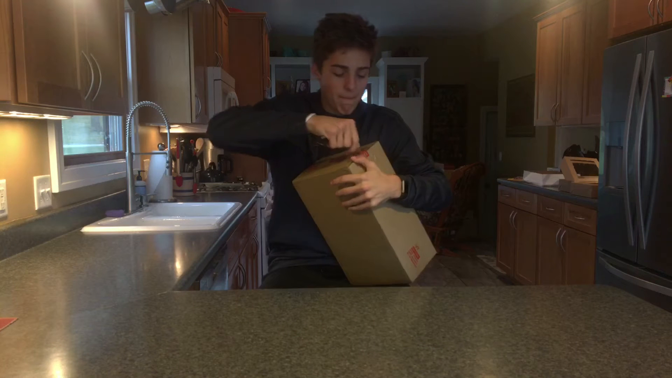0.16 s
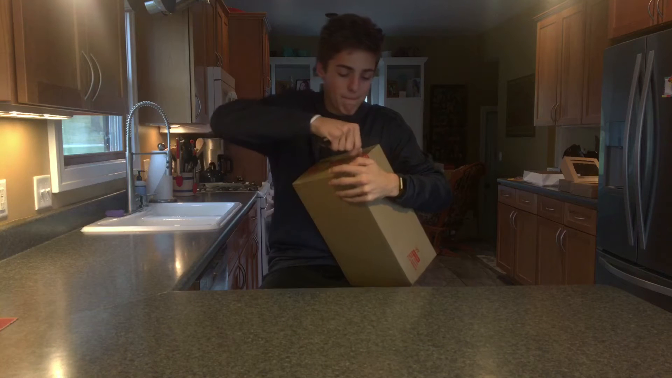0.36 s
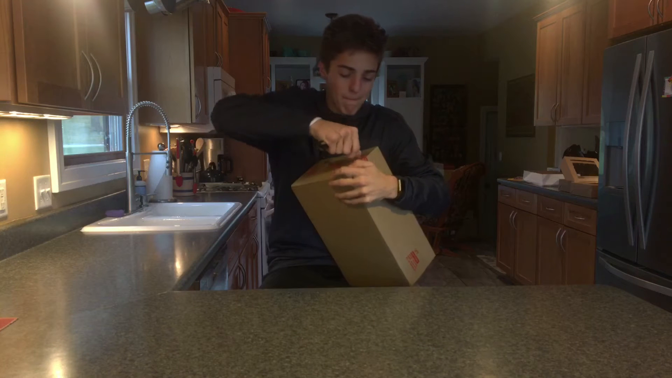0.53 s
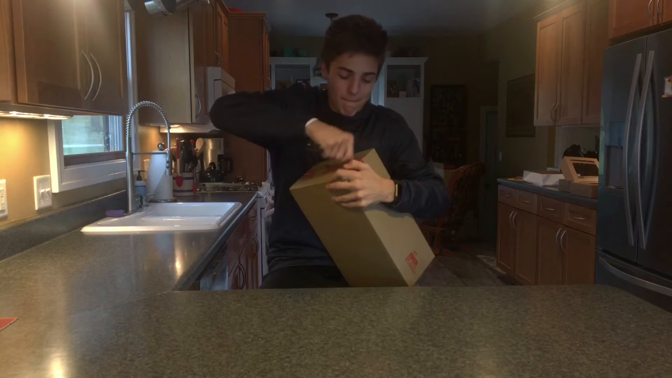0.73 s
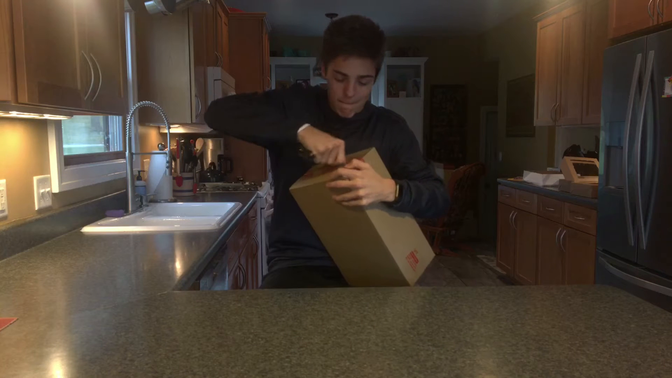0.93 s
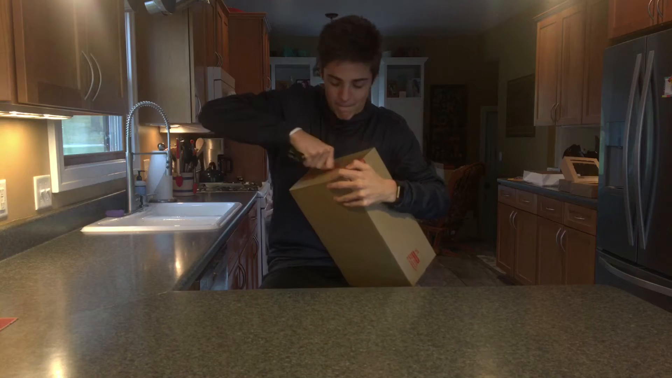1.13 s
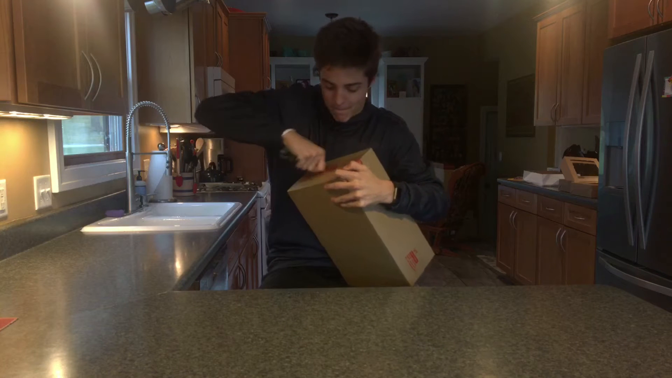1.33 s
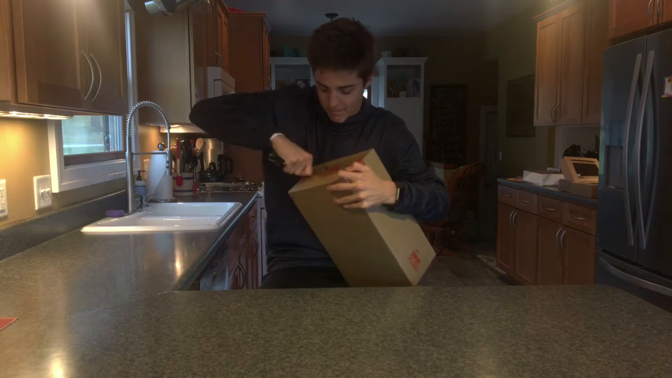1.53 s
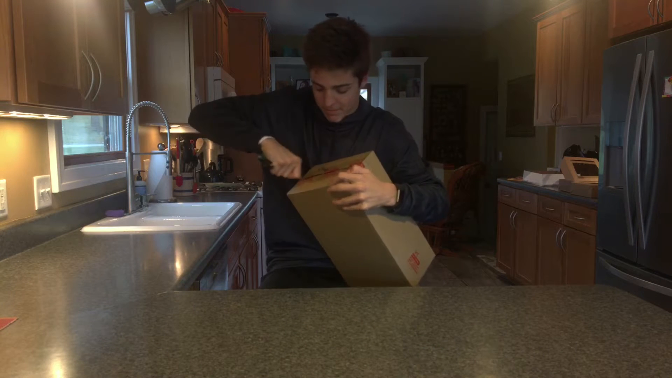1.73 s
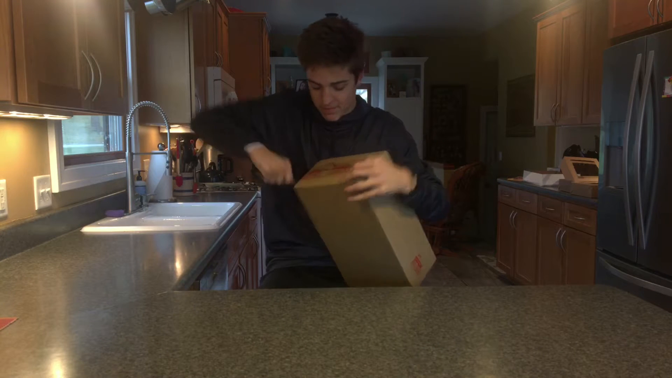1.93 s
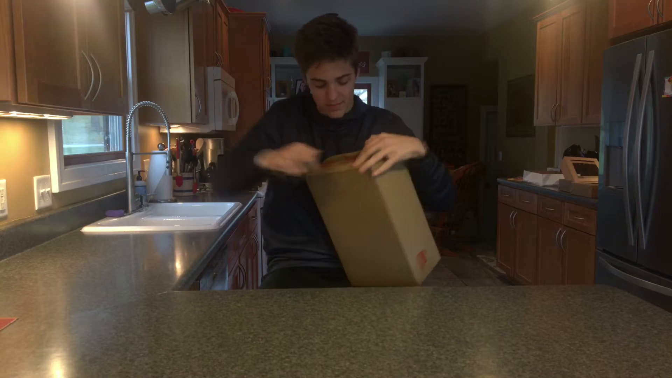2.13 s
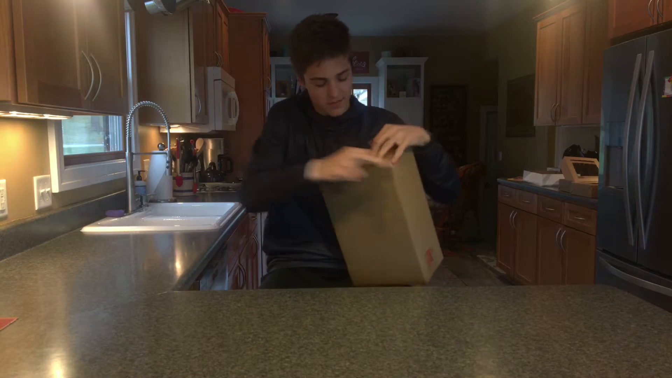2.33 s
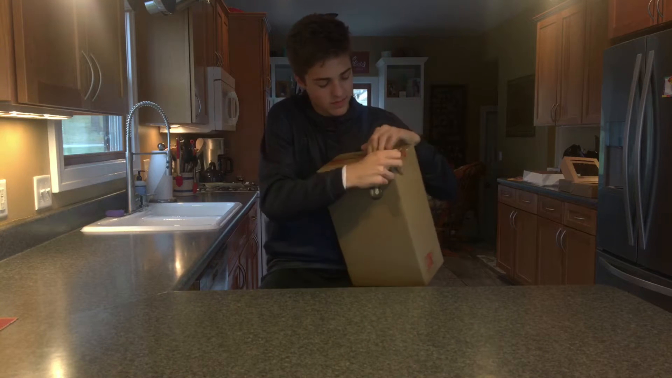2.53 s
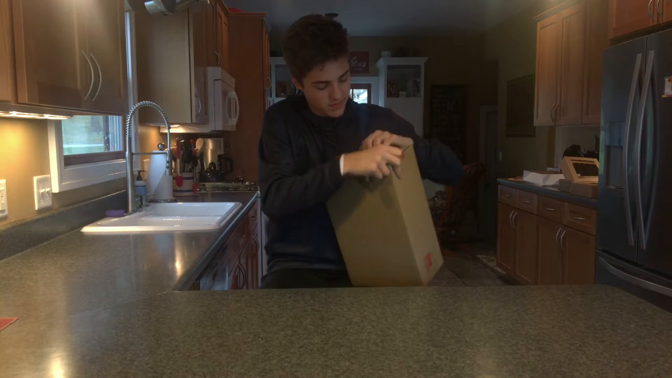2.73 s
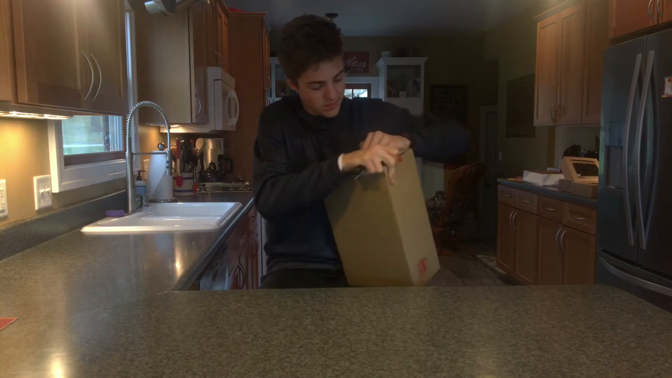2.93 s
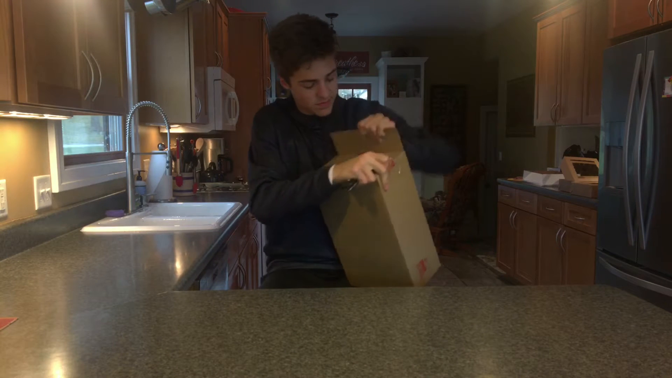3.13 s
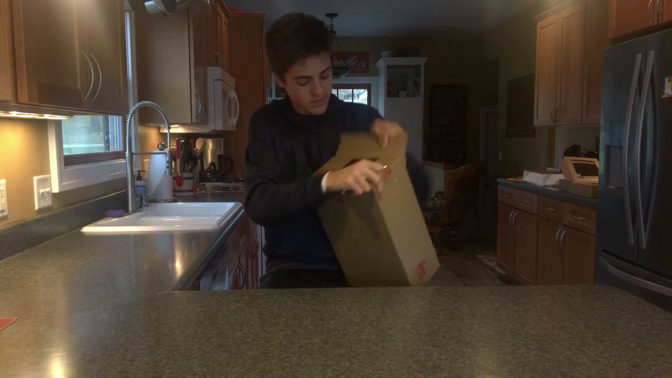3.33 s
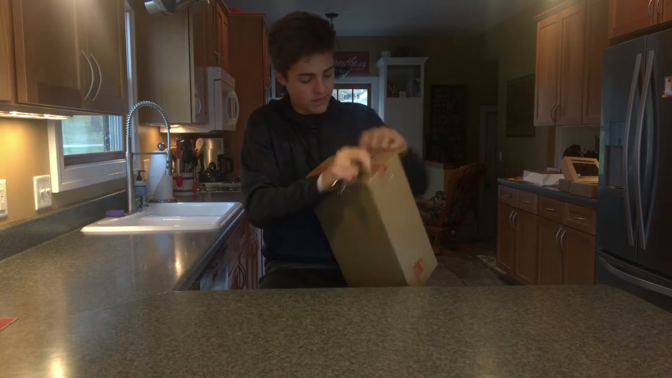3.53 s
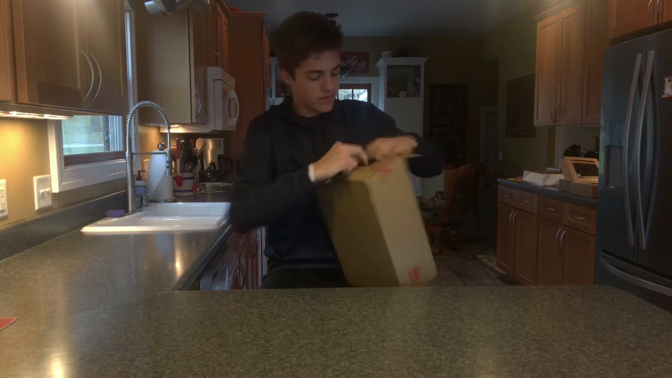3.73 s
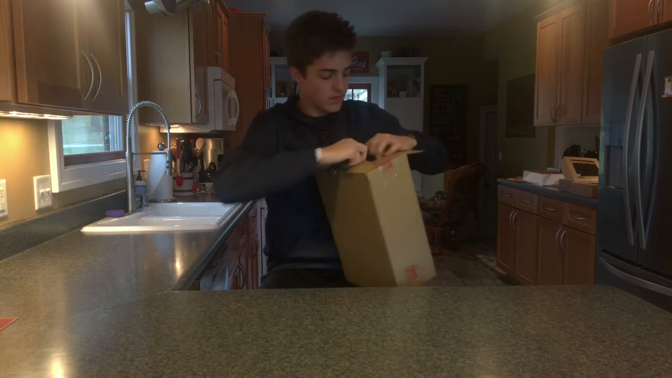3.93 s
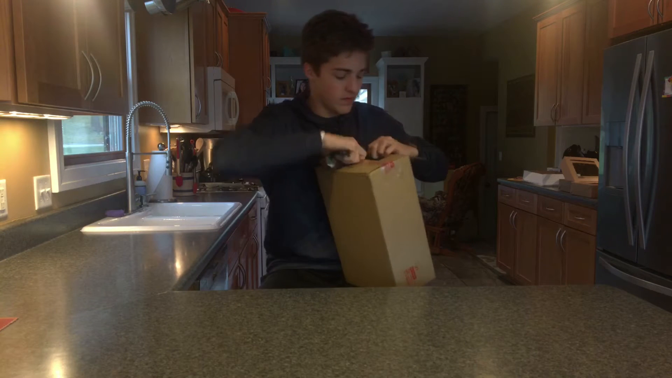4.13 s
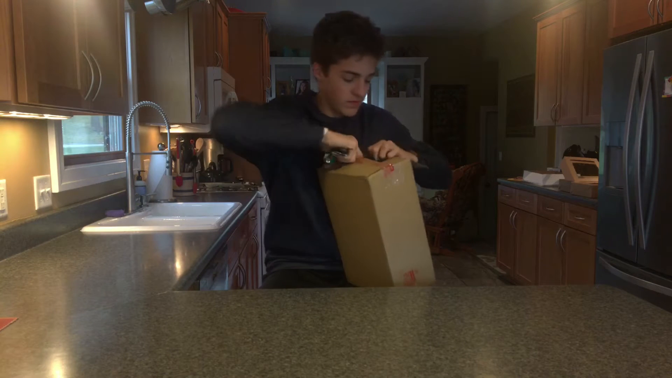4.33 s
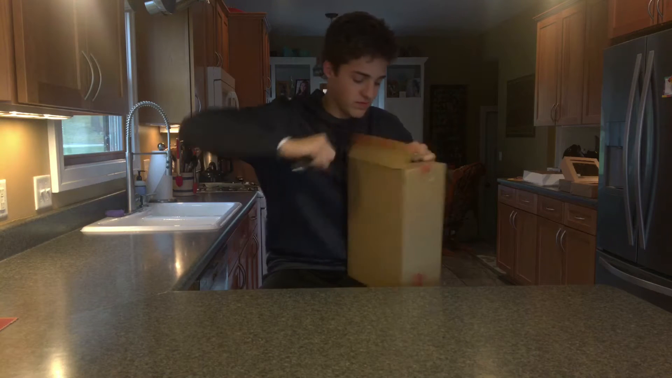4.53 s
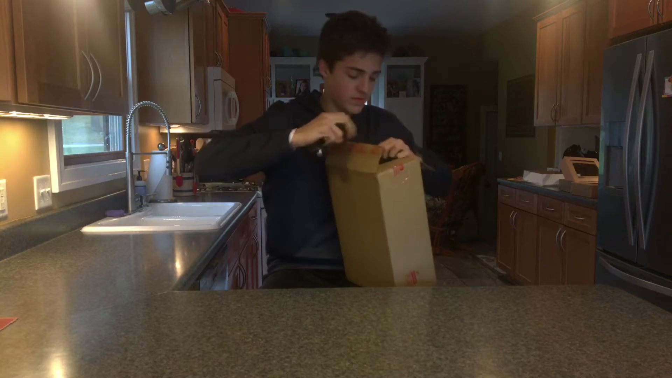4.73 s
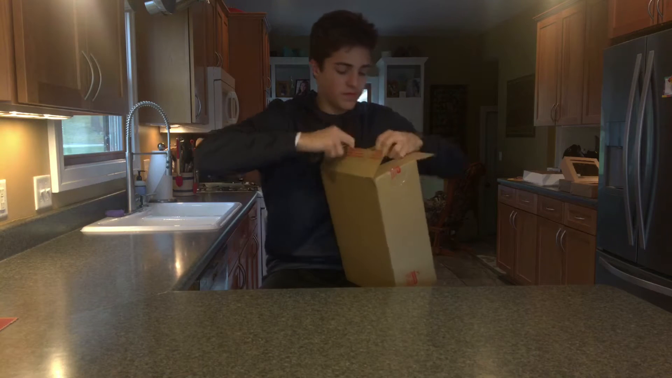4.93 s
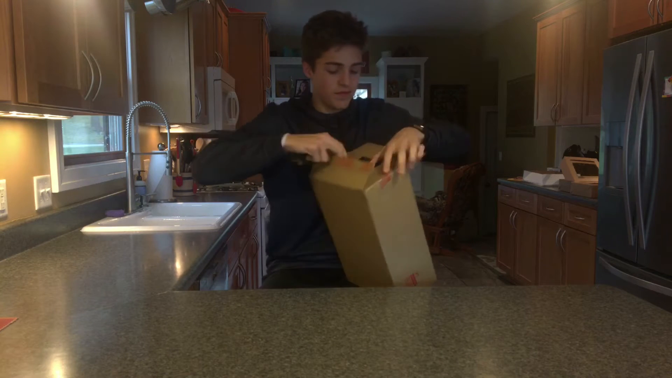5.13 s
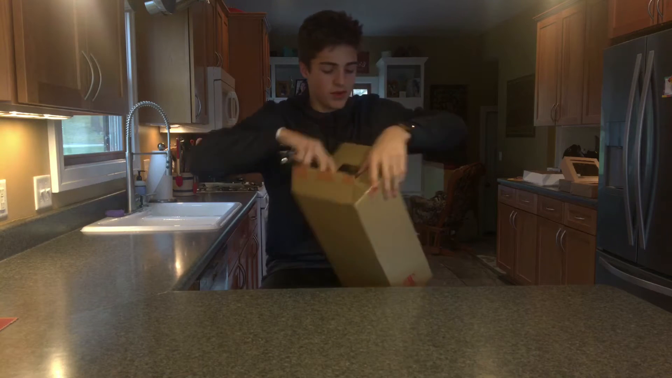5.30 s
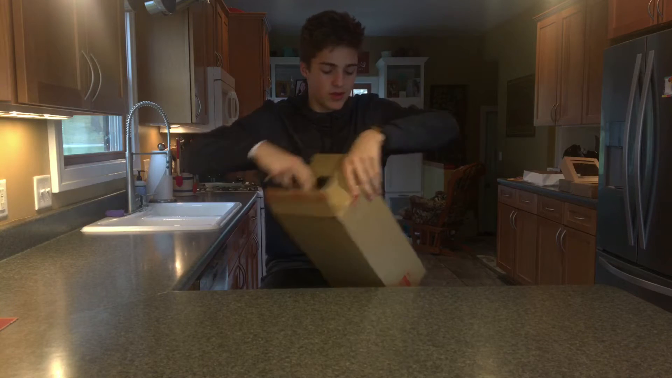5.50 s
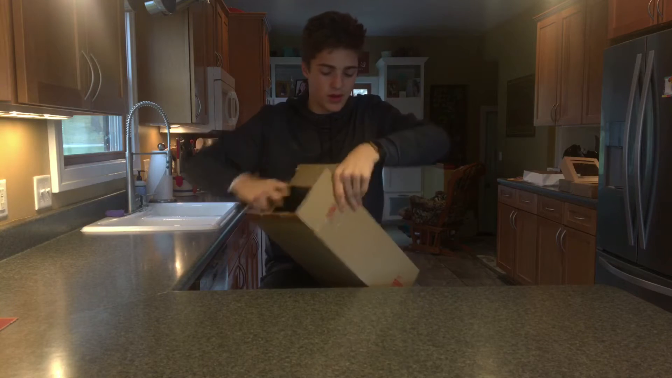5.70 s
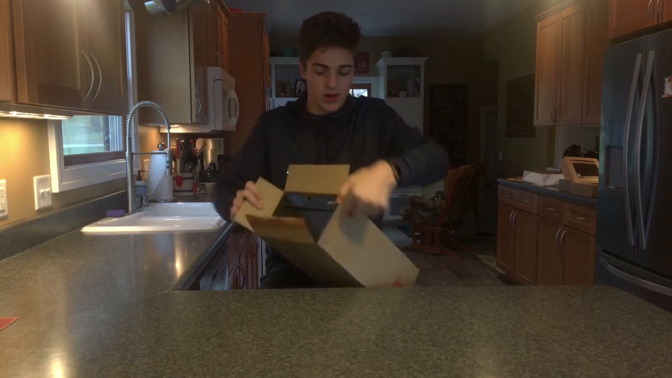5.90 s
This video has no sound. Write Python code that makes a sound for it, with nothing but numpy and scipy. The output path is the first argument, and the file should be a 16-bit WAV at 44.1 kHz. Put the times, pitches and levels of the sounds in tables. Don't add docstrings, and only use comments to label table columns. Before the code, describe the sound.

A medium-sized cardboard carton is opened by hand on a kitchen counter. It starts with dry fibre ticks and light rubbing, then busier tape pops and dull hollow bumps. Palms shift the box quietly before two explosive, very short rips, over a second apart, each booming through the box. Crackling bends and bright tearing scrapes finish it. Mono, close perspective, modest indoor reverberation, soft low room tone.

```python
import sys
import numpy as np
from scipy import signal
from scipy.fft import rfft, irfft
from scipy.io import wavfile
from scipy.ndimage import uniform_filter1d

SR = 44100
rng = np.random.default_rng(int(sys.argv[2]) if len(sys.argv) > 2 else 0)


def to_wav(s):
    ch = np.atleast_2d(s).T
    pcm = np.round(np.clip(ch, -1, 1) * 32767)
    wavfile.write(sys.argv[1], SR, pcm.astype(np.int16))


def makeup_ratio(level_db):
    decades = np.asarray(level_db, float) / 20
    return 10 ** decades


N = 262736


def rms_one(x):
    return x / np.sqrt(np.mean(x ** 2) + 1e-20)


def at_hz(points, hz, col=1):
    table = np.array(points)
    return np.interp(np.log(hz), np.log(table[:, 0]), table[:, col])


def band(x, low_hz, high_hz):
    edges_hz = [low_hz, min(high_hz, 0.45 * SR)]
    return signal.sosfilt(signal.butter(2, edges_hz, "band", fs=SR, output="sos"), x)


def resonance(x, hz, width_hz):
    r = np.exp(-np.pi * width_hz / SR)
    poles = [1, -2 * r * np.cos(2 * np.pi * hz / SR), r * r]
    return signal.lfilter([(1 - r * r) / 2, 0, (r * r - 1) / 2], poles, x)


def drift(rate_hz):
    r = np.exp(-2 * np.pi * rate_hz / SR)
    return rms_one(signal.lfilter([1], [1, -2 * r, r * r], rng.standard_normal(N + SR))[SR:])


def coloured(x, spectrum):
    hz = np.maximum(np.fft.rfftfreq(N, 1 / SR), 1)
    return rms_one(irfft(rfft(x) * makeup_ratio(at_hz(spectrum, hz)), N))


def grit(per_s, spread_db, flicker_db, rate_hz):
    sizes = makeup_ratio(spread_db * np.minimum(rng.exponential(1, N), 4)) * rng.standard_normal(N)
    slips = sizes * (rng.random(N) < per_s / SR)
    return rms_one(slips * makeup_ratio(flicker_db * drift(rate_hz)))


# [f/Hz, width/Hz, level/dB]
PANEL_MODES = [(690, 260, -2), (1258, 99, 2), (1800, 1950, -4.5)]


def panel(x):
    return sum((-1) ** k * makeup_ratio(db) * resonance(x, hz, width) for k, (hz, width, db) in enumerate(PANEL_MODES))


# [f/Hz, level/dB, t60/s]
BOX_MODES = [(141.5, -1.5, 0.069), (296.2, -5.5, 0.087), (340, -1.5, 0.035), (413, -4, 0.013),
             (630, -13.5, 0.03)]


def box(x):
    out = []
    for hz, db, t60_s in BOX_MODES:
        r, w = makeup_ratio(-60 / (t60_s * SR)), 2 * np.pi * hz / SR
        poles = [1, -2 * r * np.cos(w), r * r]
        out.append(signal.lfilter([0, makeup_ratio(db) * np.sin(w)], poles, x + 1e-18))
    return out


def ring_clusters(rows, spread):
    size = 22050
    out = np.zeros(N + size)
    for s, db, hz, t60_s in rows:
        shove = rng.standard_normal(size) * makeup_ratio(-60 * np.arange(size) / (t60_s * SR))
        width_hz = 0.13 * hz * spread
        sound = sum(resonance(shove, hz * ratio ** spread, width_hz) for ratio in (0.91, 1.0, 1.12))
        at = round(s * SR)
        out[at:at + size] += makeup_ratio(db - 4) * sound / np.abs(sound).max()
    return out[:N]


# [f/Hz, density/dB per Hz]
AIR_SPECTRUM = [(53, -28), (90, -4), (221, 1.5), (318, 1.5), (592, -8.5), (4930, -17), (6370, -13),
                (15000, -15)]


def room_air():
    return makeup_ratio(-57.5) * coloured(rng.standard_normal(N), AIR_SPECTRUM)


def counter():
    rest_db, shudder_db, shudder_s = -55, -29.5, 0.027
    lumps = rms_one(band(rng.standard_normal(N), 32.4, 64.0) * makeup_ratio(3.1 * drift(3.6)))
    s, db, deep_db = np.transpose(PUSHES + NUDGES)
    jolts = np.zeros(N)
    jolts[np.round(s * SR).astype(int)] = makeup_ratio(0.91 * (db + deep_db) + shudder_db)
    jolts = uniform_filter1d(jolts, size=900, origin=449)
    shudder = signal.lfilter([1], [1, -np.exp(-1 / (shudder_s * SR))], jolts)
    return lumps * (makeup_ratio(rest_db) + shudder)


# [t/s, length/s, rub level/dB, weight on card/dB]
SEAM_STROKES = [(0.0, 0.019, -52, 7), (0.125, 0.086, -52, -17), (0.304, 0.052, -49, -13),
                (0.61, 0.08, -60.5, -3), (0.738, 0.095, -46, -8), (0.858, 0.016, -41.5, 5.5),
                (0.908, 0.19, -62, -6), (1.034, 0.053, -36, 1.5), (1.144, 0.065, -50, 6),
                (1.232, 0.12, -46.5, 4.5), (1.328, 0.096, -40.5, 10), (1.508, 0.097, -42, 7),
                (1.696, 0.066, -42.5, -9), (1.778, 0.039, -48.5, 14.5), (1.886, 0.21, -50.5, -37)]
# [t/s, length/s, rub level/dB, weight on card/dB]
FLAP_STROKES = [(2.131, 0.028, -51.5, 2), (2.264, 0.054, -46, -7), (2.395, 0.12, -45, -10.5),
                (2.544, 0.049, -66, -15), (2.623, 0.13, -63, -14), (2.734, 0.29, -56, 4),
                (3.14, 0.33, -51, -2), (3.464, 0.033, -48, -15), (3.503, 0.15, -45.5, -5.5),
                (3.725, 0.092, -40, -1.5), (3.895, 0.28, -49.5, -1), (4.162, 0.14, -53, 9.5),
                (4.458, 0.029, -31.5, 3), (4.593, 0.19, -55.5, 9.5), (4.832, 0.12, -51, 3.5),
                (4.98, 0.15, -47.5, -8), (5.116, 0.017, -39.5, -9), (5.15, 0.15, -42.5, -31),
                (5.423, 0.1, -40.5, -23), (5.482, 0.17, -36.5, -6.5), (5.676, 0.17, -31.5, -9)]


def strokes():
    rise_s, fade_s, resting_db = 0.013, 0.035, -77.5
    sheet_follows, hollow_follows = 0.71, 0.84
    t = np.arange(N) / SR
    rub, sheet, hollow = np.full((3, N), makeup_ratio(resting_db))
    for s, length_s, db, weight_db in SEAM_STROKES + FLAP_STROKES:
        rise = np.clip((t - s) / rise_s, 0, 1)
        shape = rise * np.exp(-np.maximum(t - s - length_s, 0) / fade_s)
        rub = rub + makeup_ratio(db) * shape
        sheet = sheet + makeup_ratio(db + sheet_follows * weight_db) * shape
        hollow = hollow + makeup_ratio(db + hollow_follows * weight_db) * shape
    return rub, sheet, hollow


# [f/Hz, density/dB per Hz]
RUB_SPECTRUM = [(900, -41), (1500, -11.5), (2440, -13), (3900, -6), (7100, -5), (10300, -4), (13000, -4.5),
                (16000, -6)]


def rubbing():
    rub, bend, hollow = strokes()
    fibres = grit(per_s=290, spread_db=6.0, flicker_db=-1.0, rate_hz=34)
    slips = grit(per_s=12000, spread_db=2.5, flicker_db=2.2, rate_hz=40)
    slips = coloured(slips + 0.15 * fibres, RUB_SPECTRUM)
    edges_hz = np.geomspace(1000, 19000, 12)
    bright = 0
    for k in range(11):
        patch_db = np.minimum(2.7 * drift(37) + 1.4 * drift(3.5), 4.0)
        bright = bright + (-1) ** k * band(slips, *edges_hz[k:k + 2]) * makeup_ratio(patch_db)
    bright = rms_one(bright)
    sheet = grit(per_s=4000, spread_db=2.0, flicker_db=3.5, rate_hz=50)
    sheet = rms_one(panel(sheet) + 0.16 * band(sheet, 410, 1700))
    shoves = grit(per_s=400, spread_db=2.0, flicker_db=2.5, rate_hz=22)
    rumble = rms_one(band(sum(box(shoves)) + 2.6 * band(shoves, 150, 480), 187, 770))
    return makeup_ratio(-2.5) * rub * bright + makeup_ratio(-4.5) * bend * sheet + makeup_ratio(-5.5) * hollow * rumble


def flecks():
    per_s, level_db, fade_ms, width_share = 260, -10, 6, 0.08
    rub = strokes()[0]
    fade = np.exp(-1000 / (fade_ms * SR))
    born = rng.random(N) < per_s / SR
    dealt = rng.integers(0, 16, N)
    noise = rng.standard_normal(N)
    total = 0
    for k, hz in enumerate(np.geomspace(1500, 9000, 16)):
        scuffs = noise * signal.lfilter([1], [1, -fade], (born & (dealt == k)) + 1e-18)
        total = total + resonance(scuffs, hz, width_share * hz) / np.sqrt(hz)
    return makeup_ratio(level_db) * rub * rms_one(total)


# [f/Hz, t60/s, level/dB]
KITCHEN_TAILS = [(98, 0.41, -5.5), (296, 0.37, -11.5), (570, 0.49, -7.5), (1260, 0.6, -5),
                 (2300, 0.55, -9.5), (4050, 0.64, -11.5), (8500, 0.37, -11.5), (14500, 0.23, -15.5)]


def kitchen(x, cracks):
    scatter_per_s = 600
    t = np.arange(SR) / SR
    edges_hz = 60 * 2 ** np.arange(0, 8.6, 0.5)
    place = 2.279 * np.arange(N) / SR
    out = 0
    for k in range(3):
        tail = 0
        for low, high in zip(edges_hz, edges_hz[1:]):
            hz = np.sqrt(low * high)
            decay = makeup_ratio(-60 * t / at_hz(KITCHEN_TAILS, hz)) * (1 - np.exp(-t / 0.0015))
            dying = rng.standard_normal(SR) * decay
            dying = dying / np.sqrt(np.sum(dying ** 2))
            tail = tail + 2.41 * makeup_ratio(at_hz(KITCHEN_TAILS, hz, 2)) * band(dying, low, high)
        share = np.cos(np.pi * (place + k) / 3) ** 2
        sent = x * share + cracks * drift(scatter_per_s) / np.sqrt(8)
        out = out + signal.fftconvolve(sent, tail)[:N]
    return out


# [t/s, level/dB, f/Hz, t60/s]
BUZZES = [
    (3.068, -25.5, 1430, 0.95),
    (5.7, -28, 3460, 0.34),
    (1.6, -43, 4100, 0.19),
    (0.0044, -39, 139, 0.22),
]


def buzzes():
    return ring_clusters(BUZZES, spread=0.31)


# [t/s, level/dB, treble re level/dB, ring f/Hz]
TICKS = [(0.024, -34.5, 3, 4000), (0.0858, -33, 2, 3800), (0.089, -34, 1, 3800), (0.1404, -27.5, -12, 2300),
         (0.1512, -31, 6, 8200), (.1545, -34, -8, 6500), (0.3073, -37, 2, 8500), (0.3177, -36, -8, 2200),
         (.338, -38, 6, 9000), (.351, -29, -1, 2750), (.404, -35, -4, 2690), (0.4857, -42, -7, 5100),
         (0.588, -32.5, -1, 7100), (0.647, -30.5, 6.5, 5660), (0.6936, -36, -2, 2450),
         (.699, -37, -2, 8500), (0.7406, -29, 8, 7000), (1.9218, -24.5, -4, 2520),
         (1.9958, -30.5, -20, 3080), (2.14, -27.5, -6, 4040), (2.2835, -39, -11, 2550),
         (2.481, -33, 5, 1630), (2.5373, -30.5, -1, 4400), (2.5955, -35.5, -1, 4260), (2.756, -31, 0, 4070),
         (2.814, -32.5, -1, 4170), (2.873, -26, -6, 4740), (2.936, -50, 12, 9000), (2.9619, -35, 1, 2400),
         (2.985, -52, -12, 5500), (3.016, -54, -3, 1930), (3.454, -31.5, -2, 5570),
         (1.2366, -26.5, 1, 4570), (1.296, -18, 0, 2900), (1.372, -21, -4, 3000), (3.642, -39, 0, 6000),
         (3.805, -24.5, 4, 5860), (3.86, -28, -15, 3890), (3.874, -26, -9, 3700), (4.033, -38, -6, 4500),
         (5.488, -27, 4, 4530), (5.5628, -26, 2, 4550), (3.937, -45, 0, 2410), (4.06, -30, 3, 2450),
         (4.099, -27, -5.5, 2500), (4.24, -23.5, -15, 1670), (4.794, -30.5, -4, 5140),
         (4.9352, -34, 8.5, 4060)]
# [t/s, level/dB, treble re level/dB, ring f/Hz, length/ms]
TEARS = [
    (0.327, -27, -0.5, 3330, 6.4),
    (1.5351, -32, -27, 1720, 11),
    (1.708, -25, -13, 5180, 6.1),
    (2.2857, -27, 0, 6400, 11),
    (5.489, -19, 4, 3180, 4.6),
    (5.56, -12.5, 6.5, 4650, 7.7),
    (5.689, -24, -15, 2960, 4.2),
    (5.7075, -13.5, 4.5, 5230, 24),
]
# [t/s, level/dB, treble re level/dB, ring f/Hz]
TAPE = [(.743, -15, 4, 2600), (0.866, -28, -1, 2270), (0.873, -17.5, -5, 2870), (0.952, -23, -2, 2960),
        (1.035, -26, -12, 4250), (1.073, -19, -4, 1686), (1.1764, -25.5, -1, 1970), (1.24, -21, 0, 6800),
        (1.274, -15, -6.5, 2950), (1.3038, -19, -5, 5300), (1.3289, -10, -5, 3780), (1.353, -14, -8, 5670),
        (1.583, -22, 1, 1790), (1.636, -19, 1, 3060), (1.751, -25, -11, 3520), (1.783, -9.5, -6.5, 7800),
        (1.8116, -19.5, -2, 2500)]
# [t/s, level/dB, treble re level/dB, ring f/Hz]
SNAPS = [(2.152, -21.5, -6.5, 3440), (2.749, -28.5, -15, 4130), (2.847, -27.5, -1, 6200),
         (3.5037, -20.5, -1, 4560), (3.585, -23, 1, 2880), (3.624, -20, -1, 3460),
         (3.6971, -11.5, 5.5, 9040), (3.71, -7.5, -5, 8300), (3.7652, -18.5, 0, 9850),
         (3.9518, -25, 1, 2620), (4.073, -22, -5, 3100), (4.1789, -47, -10, 1820),
         (4.344, -26.5, 3.5, 3060), (4.3612, -15, 2.5, 4700), (4.7524, -23, -12, 4470),
         (4.8215, -37, 6, 2180), (5.1294, -20.5, 1, 4500), (5.1592, -16, 3, 3980), (5.2542, -18, -15, 4900),
         (5.287, -17, -2, 2750), (5.4012, -12.5, -20, 1620), (5.8613, -19, -20, 4470),
         (5.9391, -11.5, -4, 5600)]
# [t/s, level/dB, treble re level/dB, ring f/Hz, length/ms]
RIPS = [(3.0612, -0.5, -2.5, 3060, 2.76), (3.0634, -8, -16, 1420, 2.9), (3.068, -3, -17, 3460, 1.6),
        (3.075, -2, -16, 1530, 4), (3.0836, -11, 7, 5530, 3.05), (3.088, 0.5, -15, 1780, 2.8),
        (3.092, -0.5, -20, 1700, 8.2), (4.3963, 0.5, -10, 2460, 2.86), (4.401, -10, -4, 2830, 1.8),
        (4.4069, -3.5, 2.5, 4220, 2.45), (4.4175, -1, -0.5, 4100, 1.3), (4.4484, -18, -7, 2800, 2),
        (4.4331, -7, 3, 6800, 2.1), (4.438, -0.5, -19, 1920, 2.5), (4.443, -10, -12, 1490, 2.1)]


def snaps():
    tick_ms, crack_ms, brittle_hz = 1.37, 3.13, 8500
    rows = [(*row, tick_ms) for row in TICKS]
    rows += [(*row, crack_ms if row[-1] < brittle_hz else tick_ms) for row in TAPE + SNAPS]
    rows += TEARS + RIPS
    count, size = len(rows), 4096
    out = np.zeros(N + size)
    t_ms = np.arange(size) / SR * 1000
    crackle = rng.standard_normal((count, 3, size))
    crackle = crackle * makeup_ratio(4.29 * rng.standard_normal((count, 1, size)))
    lumps = uniform_filter1d(rng.standard_normal((count, 1, size)), size=40) * np.sqrt(40)
    crackle = crackle * makeup_ratio(2.78 * lumps)
    for (s, db, treble_db, hz, ms), noise in zip(rows, crackle):
        rise_ms = 0.35 + 3.44 * max(ms - 2.7, 0)
        burst = noise * np.exp(-t_ms / ms) * (1 - np.exp(-t_ms / rise_ms))
        middle = band(burst[0], np.clip(0.65 * hz, 1300, 4500), 7000)
        middle = middle + 1.96 * resonance(burst[0], hz, 0.24 * hz)
        treble = band(burst[1], 7700, 19000)
        sheet_db = -16 - 0.5 * np.log2(hz / 3000)
        sound = middle + makeup_ratio(treble_db + 4.5) * treble + makeup_ratio(sheet_db + 20.5) * panel(burst[2])
        at = round(s * SR)
        out[at:at + size] += makeup_ratio(db - 6.5) * sound
    return out[:N]


# [t/s, level/dB, f/Hz, t60/s]
SCRAPES = [(5.49, -25, 5300, 0.14), (5.514, -28, 5200, 0.092), (5.517, -41, 3100, 0.09),
           (5.633, -27.5, 3230, 0.11), (5.68, -27, 3000, 0.13), (5.708, -17.5, 5100, 0.14),
           (5.71, -24, 8600, .2), (5.757, -23.5, 5600, 0.39), (5.81, -27, 8300, 0.22),
           (5.855, -26.5, 3500, 0.044), (5.636, -24.5, 335, 0.13), (3, -34, 3500, 0.29),
           (0.12, -43, 3100, 0.25)]


def scrapes():
    return ring_clusters(SCRAPES, spread=0.31)


# [t/s, level/dB, f/Hz, t60/s]
KNOCKS = [(0.743, -24.5, 1800, 0.078), (1.074, -22, 665, 0.083), (1.786, -25.5, 744, 0.17),
          (2.441, -36, 1110, 0.078), (3.061, -8, 1410, 0.026), (3.066, -1, 1284, 0.049),
          (3.085, -11, 1330, 0.092), (3.961, -27.5, 510, 0.021), (4.397, -3.5, 820, 0.017),
          (4.433, -2, 1990, 0.014), (4.441, -11.5, 630, 0.032), (4.822, -14.5, 630, 0.02),
          (5.131, -35.5, 530, 0.064), (5.254, -19.5, 1130, 0.037), (5.401, -17, 800, 0.033),
          (5.737, -14, 1240, 0.016), (5.939, -20, 1620, 0.023)]


def knocks():
    return ring_clusters(KNOCKS, spread=1)


# [t/s, level/dB, deepest mode re level/dB]
PUSHES = [(0.751, -24, -4), (0.876, -11.5, -11), (1.042, -20.5, -26), (1.073, -19.5, -23),
          (1.278, -15.5, -16), (1.331, -12.5, -43), (1.507, -21.5, -34), (1.787, -15, -23),
          (1.816, -15, -3), (2.449, -20.5, -12), (2.801, -28.5, -16), (3.062, -12.5, -3), (3.09, 4, -9.5),
          (3.589, -16, -18), (3.632, -23.5, -22), (3.705, -13, -12.5), (3.8, -17, -19), (3.968, -22.5, -11),
          (4.135, -26.5, -6), (4.208, -18.5, -18), (4.316, -24, -34), (4.4, -2.5, -9), (4.435, 1, -2.5),
          (4.828, -15, -24), (4.894, -23, -26), (5.159, -25.5, -7.5), (5.258, -20.5, -12),
          (5.403, -23.5, -31), (5.642, -26, -14), (5.741, -17, -11)]
# [t/s, level/dB, deepest mode re level/dB]
NUDGES = [(1.162, -36, 0), (0.916, -40, -17), (1.353, -12, -18), (3.87, -30, -15), (4.365, -25, -14),
          (1.45, -33.5, 11), (1.56, -39, 9), (1.619, -39.5, 15), (1.09, -33, 4), (2.143, -44, -7),
          (2.284, -44, 5), (2.329, -45.5, 13), (2.87, -48, 10), (2.937, -33.5, -7), (3.543, -29, -15),
          (3.757, -27, -0.5), (4.182, -24.5, -12), (4.25, -22, -14), (5.29, -25.5, -15), (5.326, -31.5, 2),
          (5.857, -26, -4.5)]


def pushes():
    grip_spread_db, palm_s = 3.0, 0.002
    wall_hz, wall_width_hz = 352, 193
    s, db, deep_db = np.transpose(PUSHES + NUDGES)
    at = np.round(s * SR).astype(int)
    grips_db = grip_spread_db * rng.standard_normal((len(s), len(BOX_MODES)))
    contacts = np.zeros((len(BOX_MODES), N))
    contacts[:, at] = makeup_ratio(db - 8.5 + grips_db.T)
    contacts[0, at] = makeup_ratio(db + deep_db + 2.0)
    deep, *upper = [mode[k] for k, mode in enumerate(box(contacts))]
    soft = np.exp(-1 / (palm_s * SR))
    upper = signal.lfilter([3.89 * (1 - soft)], [1, -soft], sum(upper))
    blow = deep + resonance(upper, wall_hz, wall_width_hz) + 0.21 * upper
    return band(band(blow, 201.6, 950), 107, 1000)


# [t/s, level/dB, f/Hz, t60/s]
CORNERS = [(.8721, -31, 700, .08), (1.0601, -37, 175, 0.18), (1.3851, -31, 720, 0.14),
           (1.3951, -32, 1350, .12), (1.5101, -34, 800, 0.089), (1.5301, -37, 4500, .15),
           (1.5801, -31, 1870, 0.046), (2.1581, -39, 3400, 0.11), (2.2801, -40, 2500, 0.19),
           (2.7491, -30, 4250, 0.044), (2.7801, -41, 186, 0.42), (3.0661, -17, 3500, .2),
           (3.1901, -31, 3050, 0.27), (3.2101, -29, 323, 0.077), (3.4651, -41, 2400, 0.058),
           (3.5221, -40, 1900, .05), (3.8601, -37, 1950, .08), (3.9501, -34, 2500, 0.038),
           (4.0741, -33, 3200, 0.046), (4.0971, -31, 2540, 0.027), (4.1761, -36, 1830, 0.28),
           (4.2001, -37, 1290, 0.23), (4.2221, -27, 338, 0.13), (4.8221, -23, 1990, .04),
           (5.1621, -23, 3470, 0.055), (5.4881, -28, 2570, 0.055), (5.4941, -28, 3250, .08),
           (5.5101, -30, 1800, 0.21), (5.5241, -29, 4700, 0.039), (5.5631, -21, 4550, .06),
           (5.5871, -31, 2400, .08), (5.6451, -27, 343, .12), (5.6801, -30, 2200, .1),
           (5.6881, -28, 4200, 0.18), (5.7051, -26, 5900, .1), (5.7351, -20, 1900, 0.044),
           (5.7361, -22, 745, 0.058), (5.7541, -25, 6100, .06), (5.7921, -28, 2400, 0.24),
           (5.7941, -27, 3350, .04), (5.8601, -28, 4600, .04), (5.7901, -31, 400, .06),
           (5.9001, -39, 1010, 0.17), (5.9002, -39, 250, .2)]


def corners():
    return ring_clusters(CORNERS, spread=0.6)


# [t/s, level/dB, f/Hz, t60/s]
WALLS = [(.8761, -24, 430, .04), (.9501, -37, 520, .15), (3.0641, -15, 550, .06), (3.0901, -16, 540, .15),
         (3.0631, -12, 1130, .1), (3.6301, -31, 540, .08), (4.0001, -39, 480, .2), (4.6601, -38, 450, .15),
         (1.5501, -33, 700, .15), (1.5451, -34, 1250, .12), (1.6421, -31, 1200, .04),
         (1.0801, -31, 1650, .15), (2.1601, -41, 1300, .15), (2.4201, -42, 70, .6), (3.9502, -41, 60, .6),
         (4.4401, -16, 1050, .1), (4.2002, -36, 1850, .15), (5.4251, -30, 800, .08),
         (2.4451, -39, 1150, .1), (4.8251, -25, 700, .1), (5.2001, -33, 3350, .2), (5.2601, -30, 520, .15),
         (3.0632, -14, 6000, .05), (4.4341, -14, 12000, .04)]


def walls():
    return ring_clusters(WALLS, spread=0.6)


def scene():
    cracks, booms = snaps(), pushes()
    rings = knocks() + buzzes() + scrapes()
    hands = rubbing()
    air = room_air()
    room = kitchen(0.84 * booms + 0.65 * rings + 0.66 * hands, 1.37 * cracks)
    below = counter()
    close = corners() + walls() + flecks()
    return (cracks + booms + rings + close + hands + room + below + air)[None]


def low_pass(x):
    return signal.sosfilt(signal.butter(12, 16990, fs=SR, output="sos"), x)


# [f/Hz, width/Hz, level/dB]
MIC_DIPS = [(7750, 720, -3.5), (10400, 480, -7.5), (15200, 6200, -4.5)]


def record(dry):
    cutoff_hz = 15900
    x = dry
    for hz, width_hz, db in MIC_DIPS:
        x = x - (1 - makeup_ratio(db)) * resonance(x, hz, width_hz)
    x = 1.243 * np.tanh(x / 1.141)
    rolloff = np.clip((cutoff_hz - np.fft.rfftfreq(N, 1 / SR)) / 150, 0.003, 1)
    x = irfft(rfft(x) * rolloff, N)
    return low_pass(x)


dry = scene()
out = record(dry)
to_wav(out)
```